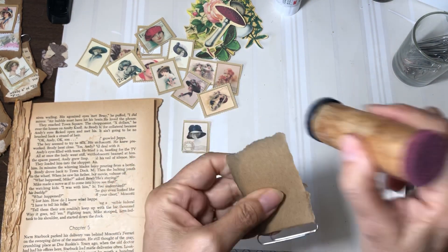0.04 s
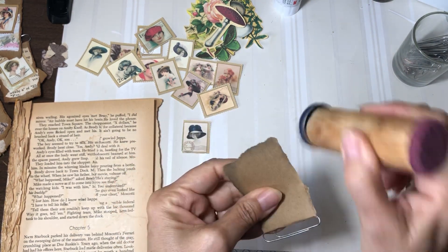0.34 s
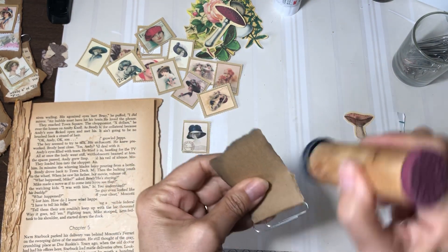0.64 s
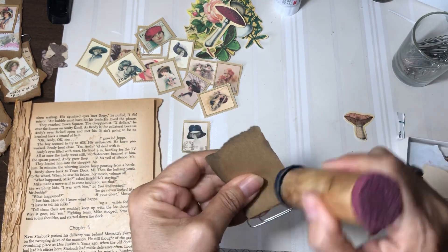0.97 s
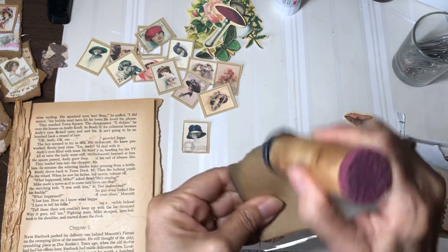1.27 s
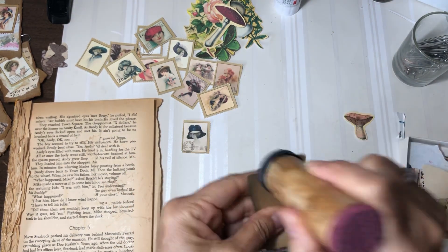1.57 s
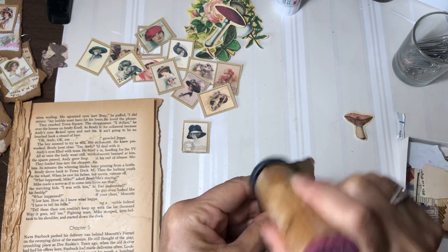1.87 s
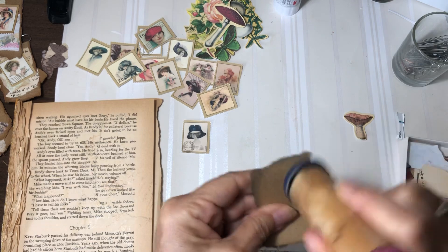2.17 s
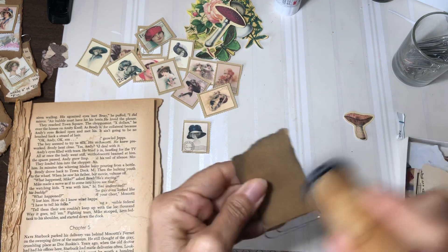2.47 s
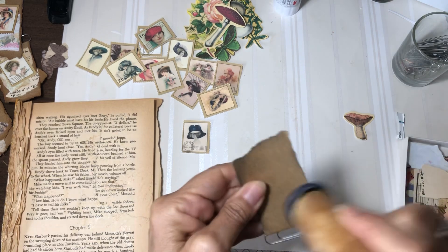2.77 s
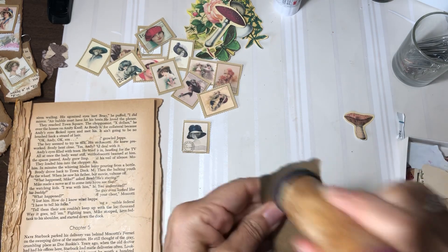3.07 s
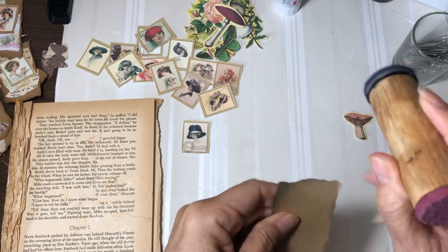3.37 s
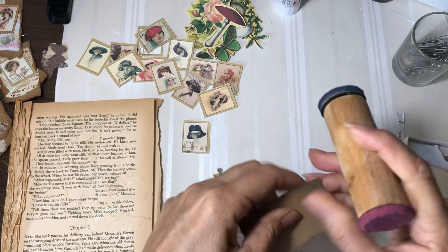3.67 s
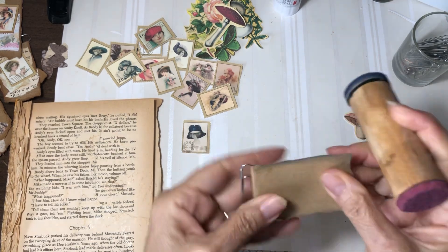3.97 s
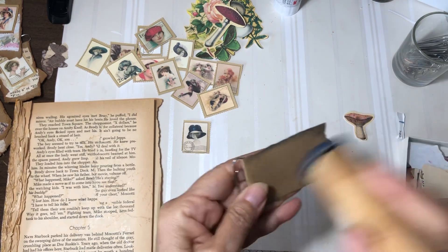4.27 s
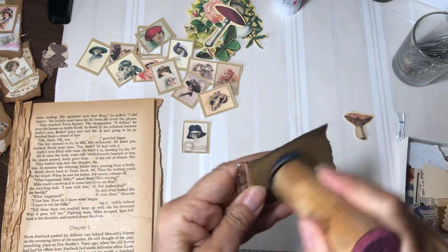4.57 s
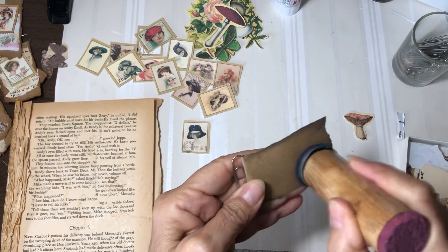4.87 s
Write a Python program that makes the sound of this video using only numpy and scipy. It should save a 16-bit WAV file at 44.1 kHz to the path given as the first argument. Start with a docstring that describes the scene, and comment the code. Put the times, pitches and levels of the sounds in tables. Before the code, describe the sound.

Close, soft rasps of foam on paper end in crisp little snaps, followed by quick back-and-forth scrubbing in a quiet room.

```python
"""Close microphone over a craft table, in a small dry room with a faint hum. Fingers shift on a small
hand-held card, then a foam ink tool is swiped over its edges, again and again. Often the foam lands
softly first; it rasps along the paper, pressing harder until it slips off the edge and the bent card
snaps back with a papery tap. Near the end fingers turn the card, then the tool scrubs quickly to and fro."""
import sys
import numpy as np
from scipy import signal
from scipy.fft import rfft, irfft, next_fast_len
from scipy.io import wavfile
from scipy.ndimage import uniform_filter1d

SR = 44100
rng = np.random.default_rng(int(sys.argv[2]) if len(sys.argv) > 2 else 0)


def materialize(psi):
    """Save the field psi as 16-bit PCM at rate SR to the path in sys.argv[1].

    A 1-D psi becomes a single channel; in a 2-D psi each row is a channel.
    """
    bounded = np.clip(np.atleast_2d(psi).T, -1, 1)
    quanta = np.round(bounded * 32767).astype(np.int16)
    wavfile.write(sys.argv[1], SR, quanta)


N = 222219

# Spectra of the room tone, the foam's hiss, the rubbed card's body and the scrape of its edge.
# Each row: frequency in Hz, relative level in dB.
AIR_SPECTRUM = [(20, -28.5), (32, -17), (45, -13.5), (80, -5.5), (150, -4), (270, -6.5), (550, -12.5),
                (1100, -17.5), (1600, -23.5), (4000, -26), (10400, -28.5), (15500, -31)]
FOAM_SPECTRUM = [(600, -22), (1800, -5.5), (2800, -8), (3500, 0.5), (4050, -1.5), (4800, 0), (5800, 0.5),
                 (7500, -3), (10500, -3), (13000, -6.5), (16000, -8.5)]
BODY_SPECTRUM = [(120, -22.5), (400, -13), (650, -8), (880, -4), (1150, 2.5), (1650, -7), (2050, -1.5),
                 (2400, 1.5), (3100, -3), (5000, -30.5), (12000, -36.5)]
SCRAPE_SPECTRUM = [(200, -9.5), (1000, 6.5), (3500, 3), (6500, -6.5), (8500, -5), (12000, -10),
                   (16000, -4.5)]
# Fingers on the card. Each row: start and end in seconds, level and swell in dB, span resonance in Hz.
FINGER_SLIDES = [(0.016, 0.13, -67.5, -2, 5500), (1.539, 1.601, -63, 8, 2880),
                 (2.202, 2.424, -61.5, -7.5, 7100), (3.24, 3.42, -66.5, 0, 11100),
                 (3.474, 3.551, -54, 4, 4730), (3.553, 3.672, -56.5, 8, 2630),
                 (3.668, 3.814, -53, 11.5, 6240), (3.917, 4.009, -65, 24, 10400),
                 (4.009, 4.085, -58, 10, 10100), (4.096, 4.222, -60.5, 4, 11150)]
# Light foam strokes that stay on the card. Each row: start and end in seconds, level and swell in dB.
FOAM_BRUSHES = [(0.131, 0.195, -59, 10.5), (1.592, 1.696, -49, -6), (1.693, 1.763, -51, 7)]
# Foam pulled off the edge. Each row: start and end in seconds, level and swell in dB, arch (0 flat,
# 1 rounded), card body trim in dB, resonance of the rubbed span in Hz, its trim in dB.
FOAM_SWIPES = [(.213, .261, -41, 15, 1.1, -9, 3640, -7.5), (0.413, 0.505, -47, 29, 0.32, -10, 5600, -5),
               (.697, .767, -44.5, 3.5, .15, -6.5, 5730, 1), (.949, 1.023, -44.5, 13, .1, -7, 5980, -0.5),
               (1.176, 1.28, -49, 10, .7, -2.5, 2490, -4), (1.814, 1.932, -47.5, 2, 0.62, -3, 2470, -6),
               (2.198, 2.236, -51.5, 24, .3, -13, 7750, -2),
               (2.536, 2.624, -44.5, 8.5, 0.223, -13.5, 3600, -23),
               (2.808, 2.879, -47, 15.5, 0.15, -4, 5700, -18), (3.108, 3.167, -48, 2.5, 0.13, -5, 6150, -8),
               (3.418, 3.478, -52, 16, .1, -4, 2600, -2.5)]
# The card springs free. Each row: time in seconds, levels of low flap, middle knock and high crack
# in dB, pitch of the whole card flapping in Hz, pitch of the free span in Hz.
EDGE_SNAPS = [(.256, -52, -45.5, -52.5, 237, 1190), (.491, -57, -66, -42, 228, 2360),
              (.762, -72.5, -67, -43.5, 240, 5560), (1.016, -85, -46, -40, 241, 2360),
              (1.2737, -39, -30.5, -33.5, 160, 1790), (1.917, -41.5, -35.5, -45.5, 470, 1410),
              (2.225, -70.5, -60, -46, 239, 6000), (2.2318, -54, -51, -41, 426, 2360),
              (2.612, -53, -41, -32.5, 140, 4600), (2.874, -33, -31, -39.5, 410, 1210),
              (3.1682, -37, -25, -26.5, 426, 2210), (3.4599, -47, -38, -31, 219, 6830),
              (3.737, -51.5, -45, -41, 268, 3500)]
# The card's bending modes. Each row: frequency in Hz, relative level in dB, 60 dB decay in seconds.
CARD_MODES = [(80, -48.5, 0.0397), (139, -8.5, 0.07), (233, 0.5, 0.018), (294, -4, 0.051), (341, -5, .025),
              (436, -0.5, 0.024), (523, -1.5, 0.021), (750, -5, 0.019), (976, -2, 0.027), (1174, 3, 0.02),
              (1343, -3.5, 0.019), (1689, -1.5, 0.038), (2060, 0, 0.017), (2466, -3, 0.0218),
              (2900, -16, 0.038), (3660, -4, 0.011), (3950, -4, 0.009), (4940, -9, 0.017),
              (5820, -5, 0.015), (6560, -7, 0.016)]
# Bumps on the card. Each row: time in seconds, flap, knock and crack levels in dB, flap pitch in Hz.
SOFT_LANDINGS = [(.42, -85, -64, -56, 240), (.666, -80, -74, -58.5, 240), (.919, -86, -70, -63, 240),
                 (1.184, -59, -59, -69, 430), (1.196, -45, -50.5, -78, 415), (1.477, -73, -76, -70, 240),
                 (1.907, -43, -44, -58, 435), (2.492, -62.5, -63, -54.5, 238), (2.826, -54, -49, -54, 428),
                 (3.08, -51, -48.5, -54, 432), (3.163, -48, -46.5, -55.5, 428),
                 (3.426, -47.5, -70, -62, 294), (3.979, -60.5, -64, -64.5, 430),
                 (4.077, -54, -69, -67, 127), (4.359, -63.5, -53.5, -58, 151)]
# The scrubbing tool turns round. Each entry: time in seconds.
SCRUB_TURNS = [4.368, 4.482, 4.577, 4.673, 4.766, 4.871, 4.985, 5.084]
# The room's tail. Each row: frequency in Hz, 60 dB decay in seconds.
ROOM_DECAY = [(150, 0.16), (1000, 0.19), (3000, 0.15), (7000, 0.16), (14000, 0.13)]


def undb(db):
    """Decibels to gain."""
    return 10 ** (np.asarray(db) / 20)


def unit(x):
    """Scale to an rms of one."""
    return x / np.sqrt(np.mean(x ** 2) + 1e-30)


def colour(x, points):
    """Shape a sound by a spectrum of (Hz, dB) points, with minimum phase so that attacks stay sharp."""
    size = next_fast_len(len(x) + 2048) * 2
    hz, db = np.transpose(points)
    freqs = np.maximum(np.fft.rfftfreq(size, 1 / SR), 1)
    gain = undb(np.interp(np.log(freqs), np.log(hz), db))
    cepstrum = irfft(np.log(gain))
    cepstrum[1:size // 2] *= 2
    cepstrum[size // 2 + 1:] = 0
    return irfft(rfft(x, size) * np.exp(rfft(cepstrum)))[:len(x)]


def band(x, lo_hz, hi_hz):
    """Causal band-pass."""
    edges_hz = [lo_hz, min(hi_hz, SR / 2 - 1000)]
    return signal.sosfilt(signal.butter(3, edges_hz, "band", fs=SR, output="sos"), x)


def fade(t, t60):
    """Exponential decay that starts at t = 0."""
    return (t >= 0) * np.exp(-np.log(1000) * np.maximum(t, 0) / t60)


def walk(rate_hz):
    """Smooth random wandering with a spread near one."""
    hold = max(int(SR / rate_hz), 1)
    steps = np.repeat(rng.standard_normal(N // hold + 1), hold)
    return unit(uniform_filter1d(steps, hold)[:N])


def add(out, start, x):
    """Mix a sound in at a time in seconds."""
    i = int(np.clip(start * SR, 0, N - 1))
    out[i:i + len(x)] += x[:N - i]


def room_tone(air_db=-70, hum_hz=57.37, hum_db=-74.5):
    """Behind everything: quiet air, a restless low murmur and a wavering hum."""
    air = unit(colour(rng.standard_normal(N), AIR_SPECTRUM)) * undb(air_db + 0.15 * walk(25))
    murmur = unit(band(rng.standard_normal(N), 91, 450)) * undb(-82.5 + 1.7 * walk(9.1))
    phase = 2 * np.pi * np.cumsum(hum_hz + 0.77 * walk(3.83)) / SR
    hum = np.sqrt(2) * np.sin(phase) * undb(hum_db + 2.3 * walk(6.1))
    return air + murmur + hum


def fibres(per_second, spread_db):
    """Dense tiny slips over paper fibres, each of its own size."""
    slips = rng.random(N) < per_second / SR
    return unit(slips * rng.standard_normal(N) * undb(spread_db * rng.exponential(size=N)))


def rubbing(strokes, span_q=1 / 0.07, squash_s=0.00364, table_bounce=0.24):
    """Slips hiss, shake the card and ring the rubbed span. Strokes are rows like those of FOAM_SWIPES."""
    grip = undb(1.1144 * walk(260) + 0.83 * walk(45))  # the contact catches and frees itself unevenly
    hiss = undb(-4.5) * grip * unit(colour(fibres(per_second=24000, spread_db=0), FOAM_SPECTRUM))
    body = undb(-7) * grip * unit(colour(fibres(per_second=7000, spread_db=0.2), BODY_SPECTRUM))
    slips = grip * fibres(per_second=8700, spread_db=4)
    out = np.zeros(N)
    for start, end, level_db, swell_db, arch, body_db, span_hz, ring_db in strokes:
        progress = np.linspace(0, 1, int((end - start) * SR))
        i = (int(start * SR) + np.arange(len(progress))) % N
        pressure = np.abs(np.sin(np.pi * progress)) ** arch * undb(level_db + swell_db * (progress - .5))
        pressure *= 1 - np.exp(-progress * (end - start) / squash_s)  # easing into contact
        span = undb(-10) * unit(signal.lfilter(*signal.iirpeak(span_hz, span_q, fs=SR), slips[i]))
        stroke = pressure * (hiss[i] + undb(body_db) * body[i] + undb(ring_db) * span)
        add(out, start, stroke)
        bounce_s = rng.uniform(.0004, .0016)  # off the table, from a new height each time
        add(out, start + bounce_s, table_bounce * stroke)
    return out


def finger_slides(arch=0.35, body_db=-8, ring_db=-6):
    """Faint strokes of fingers shifting their hold and turning the card."""
    return [(*slide, arch, body_db, span_hz, ring_db) for *slide, span_hz in FINGER_SLIDES]


def brushes(arch=0.9, body_db=-3.5, span_hz=2900, ring_db=-13):
    """Light, rounded strokes of foam that stop short of the edge."""
    return [(*brush, arch, body_db, span_hz, ring_db) for brush in FOAM_BRUSHES]


def card_ring(t, flap_hz, span_hz, focus_octaves=0.18):
    """The card's modes ring, most strongly near the pitches that the grip leaves free."""
    hz, db, t60 = np.transpose(CARD_MODES)[:, :, None]
    detune, uneven = rng.standard_normal((2, len(CARD_MODES), 1))
    near_span, near_flap = (np.exp(-(np.log2(hz / f) / focus_octaves) ** 2) for f in (span_hz, flap_hz))
    gain = undb(db + 2 * uneven + 9 * near_span + 7 * near_flap)
    age = t - 0.0004206 * np.sqrt(1000 / hz)  # low bending waves cross the card more slowly
    sign = (-1) ** np.arange(len(CARD_MODES))[:, None]
    phase = 2 * np.pi * hz * (1 + 0.022 * detune) * age
    return np.sum(sign * gain * np.sin(phase) * fade(age, t60), axis=0)


def edge_scrape(t, flap_db, tilt_db_per_octave, attack_s=0.00049):
    """The edge scrapes free and the paper rustles on for a moment."""
    spectrum = [(hz, db + tilt_db_per_octave * np.log2(max(hz / 3000, 1))) for hz, db in SCRAPE_SPECTRUM]
    grain = unit(colour(rng.standard_normal(len(t)), spectrum))
    slip = fade(t, t60=0.017 * undb(0.11 * (flap_db + 39)))  # a deeper bend scrapes for longer
    rustle = undb(-19) * fade(t, t60=0.0182)
    return grain * (slip + rustle) * (1 - np.exp(-t / attack_s))


def card_tap(flap_db, knock_db, crack_db, flap_hz, span_hz, level_window_s=0.0041):
    """One papery tap: depth of bend and sharpness of slip set its low, middle and high shares."""
    t = np.arange(int(SR / 8)) / SR
    tilt = 0.47 * (crack_db - knock_db)  # a sharp slip is brighter than a blunt knock
    tap = card_ring(t, flap_hz, span_hz) + undb(5) * edge_scrape(t, flap_db, tilt)
    shares = [(band(tap, 100, 600), flap_db),
              (band(tap, 735, 2550), knock_db + 0.14),
              (band(tap, 2490, 22000), crack_db - .3)]
    return sum(undb(db) * x / np.sqrt(np.sum(x ** 2) / (level_window_s * SR)) for x, db in shares)


def snaps(lead_s=.0014):
    """The first fibres let go, the edge springs off the foam, the card swings back weaker and duller."""
    out = np.zeros(N)
    for start, flap_db, knock_db, crack_db, flap_hz, span_hz in EDGE_SNAPS:
        first_slip = card_tap(flap_db - 4.5, knock_db - 4.5, crack_db, flap_hz, span_hz)
        # with nothing pressing on it, the card rings at its own low pitches
        rebound = card_tap(flap_db, knock_db - 2.5, crack_db - 10, flap_hz=260, span_hz=850)
        release = card_tap(flap_db, knock_db, crack_db, flap_hz, span_hz)
        swing_s = .003 * undb(.45 * (flap_db + 40))  # a deeper bend takes longer to swing back
        add(out, start - lead_s, undb(-9.5) * first_slip)
        add(out, start, release)
        add(out, start + swing_s, undb(-8.5) * rebound)
    return out


def landings():
    """The foam or a finger meets the card, one soft blow each time."""
    out = np.zeros(N)
    for start, *blow in SOFT_LANDINGS:
        add(out, start, card_tap(*blow, span_hz=1072))
    return out


def skids(length_s=0.033, swell_db=-10.5, arch=.5, body_db=-4.5, span_hz=5600, ring_db=-3.5):
    """Each landing skids on in a short, fading stroke."""
    return [(start, start + length_s, crack_db - 2.5, swell_db, arch, body_db, span_hz, ring_db)
            for start, _, _, crack_db, _ in SOFT_LANDINGS]


def scrubbing(swell_db=0, arch=1.41, body_db=-13, span_hz=5300, ring_db=-11):
    """Quick strokes of foam to and fro, dying away at each turn."""
    for k, (start, end) in enumerate(zip(SCRUB_TURNS, SCRUB_TURNS[1:])):
        level_db = -46.5 - (k % 2 == 0) - (k == 0)  # softer one way, and on the tentative first stroke
        yield start, end, level_db, swell_db, arch, body_db, span_hz, ring_db


def room(x, wet_db, echo_db, echo_s=.0085, build_s=0.0047):
    """The close sound, one early bounce from a near surface and the short tail of a furnished room."""
    t = np.arange(int(SR / 3)) / SR
    hz, t60 = np.transpose(ROOM_DECAY)
    edges_hz = np.geomspace(60, 18000, 9)
    tail = np.zeros(len(t))
    for lo, hi in zip(edges_hz, edges_hz[1:]):
        band_t60 = np.interp(np.log(lo * hi) / 2, np.log(hz), t60)
        tail += band(rng.standard_normal(len(t)), lo, hi) * fade(t, band_t60)
    tail *= 1 - np.exp(-t / build_s)
    tail = colour(tail, [(150, 2), (1500, 2.5), (5000, 1), (15000, 3.5)])
    response = undb(wet_db) * tail / np.sqrt(np.sum(tail ** 2))
    response[int(echo_s * SR)] += undb(echo_db)
    return x + signal.fftconvolve(x, response)[:N]


def scene():
    """Rubbing and taps close to one microphone, with the room tone behind."""
    strokes = [*FOAM_SWIPES, *brushes(), *scrubbing(), *finger_slides(), *skids()]
    rasps = room(rubbing(strokes), wet_db=-18, echo_db=-18.5)
    taps = room(snaps() + landings(), wet_db=-17.5, echo_db=-23.5)
    return (rasps + taps + room_tone())[None, :]


def record(dry, low_cut_hz=36, top_hz=15800):
    """The microphone drops the deepest bass and the recorder cuts the top."""
    thinned = signal.sosfilt(signal.butter(2, low_cut_hz, "high", fs=SR, output="sos"), dry)
    return signal.sosfilt(signal.ellip(10, .2, 70, top_hz, fs=SR, output="sos"), thinned)


dry = scene()
out = record(dry)
materialize(out)
```